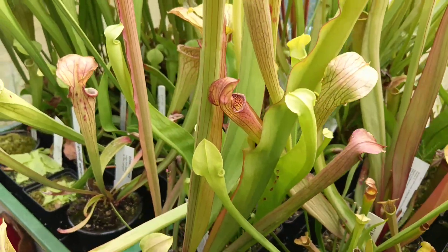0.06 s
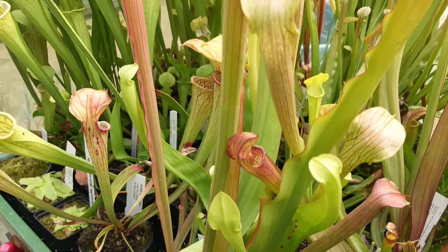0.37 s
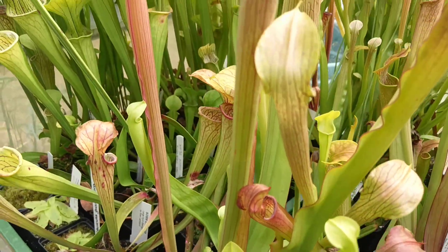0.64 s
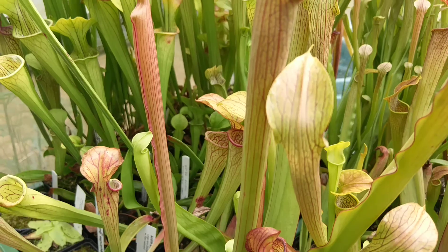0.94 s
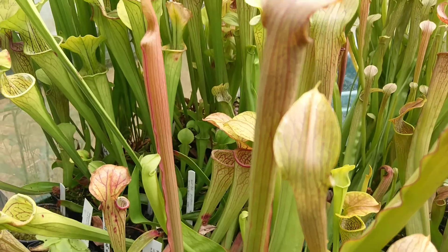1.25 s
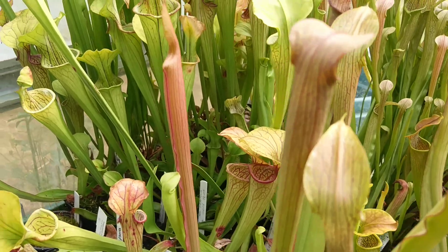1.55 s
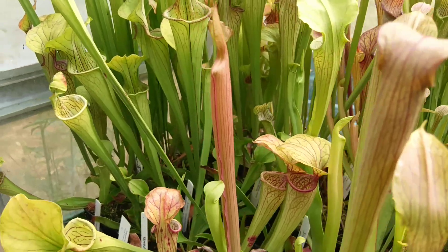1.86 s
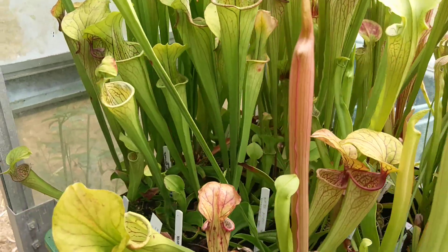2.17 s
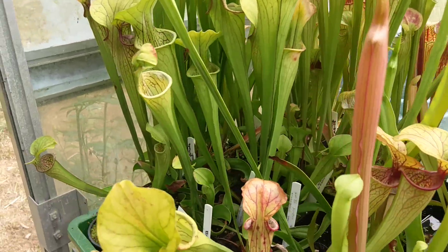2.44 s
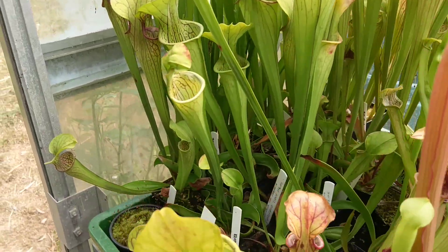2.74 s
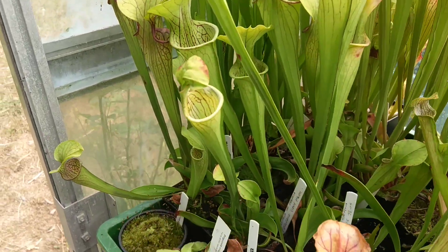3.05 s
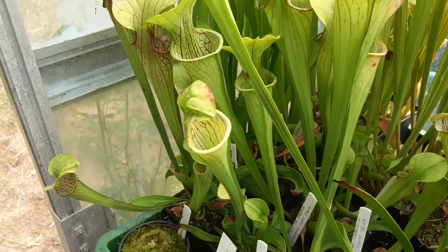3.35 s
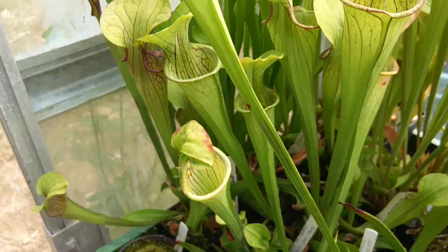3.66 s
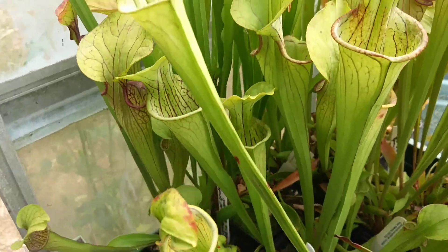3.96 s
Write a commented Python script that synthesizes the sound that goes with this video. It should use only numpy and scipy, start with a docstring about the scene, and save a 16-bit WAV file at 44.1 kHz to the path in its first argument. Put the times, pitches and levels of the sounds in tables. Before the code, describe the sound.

Distant road traffic rushes and rumbles steadily for four seconds, heard inside a greenhouse. A low engine drone comes up at about 0.8 seconds, drops away near 2.4, then returns stronger at 2.7 and rises in pitch as it pulls away. A second, slightly higher engine swells and ebbs, fading by 2.6. Between 2.7 and 3.7 seconds, nearby leaves tick faintly over a thin hiss.

```python
"""A steady rush with a low hum under it, heard inside a greenhouse: most likely a road some way off.
The rush, the traffic's rumble and the tyres' roar are random noise, each with its own spectral envelope.
The hum is periodic, set by engine firing rates: one engine drones, lets go for a moment and pulls away,
rising in pitch; a second, higher one fades out. A room resonance lifts overtones that pass through it.
Near the microphone, leaves tick faintly, as damped bursts of noise, over a thin hiss."""
import sys
import numpy as np
from scipy import signal
from scipy.fft import rfft, irfft
from scipy.io import wavfile
from scipy.ndimage import uniform_filter1d

SR = 44100
rng = np.random.default_rng(int(sys.argv[2]) if len(sys.argv) > 2 else 0)


def generate_wav(sig):
    """Save sig (samples, or channels by samples) to the path in sys.argv[1] as 16-bit PCM at SR."""
    pcm = np.round(np.clip(np.atleast_2d(sig).T, -1, 1) * 32767).astype(np.int16)
    wavfile.write(sys.argv[1], SR, pcm)


N = 176400


def amp(db):
    """The decibel scale: amplitude grows tenfold every 20 dB."""
    return 10 ** (np.asarray(db) / 20)


def unit_rms(x):
    """Normalisation to unit mean power."""
    return x / np.sqrt(np.mean(x ** 2) + 1e-20)


def at_hz(points, hz):
    """Interpolation of a spectrum on a logarithmic frequency axis."""
    f, value = np.transpose(points)
    return np.interp(np.log(hz + 1), np.log(f + 1), value)


def at_time(points, t):
    """Linear interpolation of each column of a table at times t."""
    times, *columns = np.transpose(points)
    return [np.interp(t, times, column) for column in columns]


def seconds():
    """Uniform sampling: the time of each sample."""
    return np.arange(N) / SR


def drift(rate_hz):
    """Slow random modulation: low-passed noise of rms 1."""
    f = np.fft.rfftfreq(N, 1 / SR)
    return unit_rms(irfft(rfft(rng.standard_normal(N)) * np.exp(-(f / rate_hz) ** 2), N))


def bell(f, hz, octaves):
    """A Gaussian weight in log frequency, centred on hz."""
    return np.exp(-.5 * (np.log2((f + 1) / hz) / octaves) ** 2)


def band(x, hz, octaves):
    """Band-pass filtering by a bell-shaped weight on the spectrum."""
    return irfft(rfft(x) * bell(np.fft.rfftfreq(N, 1 / SR), hz, octaves), N)


# Likeness of the two channels: (frequency [Hz], coherence [0 to 1])
COHERENCE = [(40, 1), (80, 0.9), (110, 0.71), (140, 0.56), (190, 0.046), (260, 0.59), (340, 0.54),
             (460, 0.59), (610, 0.79), (820, 0.91), (1100, .58), (1470, 0.57), (1960, 0.85), (2620, 0.82),
             (3500, 0.29)]
# Interchannel level difference: (frequency [Hz], left minus right [dB])
BALANCE = [(80, -1), (170, 2.5), (260, 0), (380, -3.5), (550, -0.5), (790, 1.5), (1140, -0.5), (1650, .5),
           (2400, 0), (3500, -2), (5000, -0.2), (7200, -.4), (11000, .2)]
# Interchannel phase difference: (frequency [Hz], lead of the left [rad])
PHASE_LEAD = [(100, 0.11), (260, -0.36), (600, 0.044), (950, 0.26), (1720, -0.37), (2800, -0.032)]

def noise(colour, patchy_db, coherence=None, size=2048):
    """Partially coherent stereo noise of rms 1, with spectral envelope colour(t, hz) in dB."""
    hop = size // 4
    t = np.arange(N // hop + 3)[:, None] * hop / SR
    hz = np.fft.rfftfreq(size, 1 / SR)
    a, b, c, d, patches = rng.standard_normal((5, len(t), len(hz)))
    # Smoothing over time and frequency leaves drifting patches of level.
    patches = unit_rms(uniform_filter1d(uniform_filter1d(patches, size=12, axis=0), size=8, axis=1))
    if coherence is None:
        coherence = at_hz(COHERENCE, hz)
    left, independent = a + 1j * b, c + 1j * d
    right = coherence * left + np.sqrt(1 - coherence ** 2) * independent
    right *= np.exp(-1j * at_hz(PHASE_LEAD, hz))
    lean = amp(at_hz(BALANCE, hz) / 2)
    spectra = np.array([left * lean, right / lean]) * amp(colour(t, hz) + patchy_db * patches)
    _, sound = signal.istft(spectra.swapaxes(1, 2), nperseg=size, noverlap=size - hop)
    return unit_rms(sound[:, :N])


# Spectrum of the hiss: (frequency [Hz], relative density [dB])
HISS_SPECTRUM = [(1500, -4), (3300, 7), (4300, 6.5), (5200, 3.5), (5700, 0.5), (7000, -1.5), (10000, -1.5),
                 (15500, -3)]

def hiss():
    """Incoherent noise: a thin hiss, almost unrelated in the two channels."""
    return amp(-72) * noise(lambda t, hz: at_hz(HISS_SPECTRUM, hz), patchy_db=1.3, coherence=-.055, size=512)


# Envelope of the rustle: (time [s], level [dB])
RUSTLE_LEVEL = [(0, -79.5), (.35, -84), (.8, -89), (2, -91), (2.5, -81.5), (2.75, -80.5), (3.2, -81),
                (3.45, -86), (3.7, -79.5), (4, -83)]
# Leaf ticks: (onset [s], level [dB], centre frequency [Hz], width [octaves])
LEAF_TICKS = [(2.698, -70, 4620, .16), (2.83, -70, 6100, .12), (2.872, -68, 4980, 0.04),
              (3.04, -73, 6330, 0.072), (3.131, -65, 4870, .2), (3.681, -70.5, 5400, .06)]

def leaves(grains_per_s=700, rise_s=.002, t60_s=.084, right_bias_db=6.5):
    """Impulsive excitation: leaves rustle in sparse random grains and tick with exponential decay."""
    t = seconds()
    grains = rng.standard_normal((2, N)) * (rng.random(N) < grains_per_s / SR)
    out = unit_rms(band(grains, hz=4480, octaves=.43)) * amp(at_time(RUSTLE_LEVEL, t)[0])
    for onset, db, hz, octaves in LEAF_TICKS:
        age = np.maximum(t - onset, 0)
        attack = np.minimum(age / rise_s, 1)
        decay = amp(-60 * np.minimum(age / t60_s, 10))
        out += amp(db) * attack * decay * unit_rms(band(rng.standard_normal((2, N)), hz, octaves))
    return out * amp(np.array([[-right_bias_db], [right_bias_db]]) / 2)


# Spectrum of the rumble: (frequency [Hz], relative density [dB])
RUMBLE_SPECTRUM = [(8, -26), (19, -1), (30, 0), (42, 1), (62, -1.5), (78, -5), (88, -7.5), (108, -4),
                   (125, -10.5), (145, -14.5), (170, -30), (260, -52), (1000, -88)]
# Its envelope: (time [s], level [dB])
RUMBLE_LEVEL = [(0, -49), (.2, -49.5), (.45, -51), (.75, -51), (1.4, -53), (2.1, -51.5), (2.6, -52.5),
                (3.3, -53), (4, -53)]

def rumble():
    """Aperiodic low-frequency sound: the deep, pitchless part of the traffic."""
    deep = noise(lambda t, hz: at_hz(RUMBLE_SPECTRUM, hz), patchy_db=1.5, size=8192)
    return deep * amp(at_time(RUMBLE_LEVEL, seconds())[0])


# Spectrum of the rush: (frequency [Hz], relative density [dB])
RUSH_SPECTRUM = [(90, -28), (175, -11), (225, -3.5), (265, -4), (300, -7), (360, -3.5), (405, -8),
                 (455, -3), (505, -5), (650, -1.5), (900, -5), (1200, -1.5), (1480, 1.5), (1770, -6.5),
                 (2000, -7), (2280, -11), (2720, -11.5), (3050, -21.5), (3500, -33.5), (6000, -42)]
# Its envelopes: (time [s], level [dB], low-band lift [dB], upper-band lift [dB], treble lift [dB])
RUSH_LEVELS = [(0, -52.5, 0.5, 0.5, 0), (.6, -52.5, 0, .5, 1), (.9, -52.5, -2, -0.5, -1.5),
               (1.25, -52, -1, 0.5, -.5), (1.7, -52.5, -3.5, 0, -0.5), (2.1, -53.5, 5.5, -1, -1),
               (2.45, -52, 3.5, 1, -0.5), (2.9, -53, 0, -1.5, 0.5), (3.45, -53, 1, -2, -1),
               (3.78, -50.5, 1.5, -3, -2), (4, -53, 2, 3, 1.5)]

def rush(treble_hz=1810):
    """Broadband noise with a time-varying spectrum: three bands slowly swell and ebb."""
    def colour(t, hz):
        """Cascaded filters add in decibels: the base spectrum, two bells and a treble shelf."""
        _, low_db, upper_db, treble_db = at_time(RUSH_LEVELS, t)
        low = low_db * bell(hz, 246, octaves=.28)
        upper = upper_db * bell(hz, 1280, octaves=.26)
        treble = treble_db * hz ** 2 / (hz ** 2 + treble_hz ** 2)
        return at_hz(RUSH_SPECTRUM, hz) + low + upper + treble

    return noise(colour, patchy_db=1.0) * amp(at_time(RUSH_LEVELS, seconds())[0])


# Spectrum of the tyres' roar: (frequency [Hz], relative density [dB])
TYRE_SPECTRUM = [(520, -27), (620, -14), (710, -11), (790, 2), (840, 2.5), (960, 1), (1030, 1),
                 (1120, -6.5), (1400, -40.5)]
# Its course: (time [s], level [dB], shift of the band [octaves])
TYRE_COURSE = [(0, -56.5, .05), (.35, -54.5, .05), (.72, -56.5, .07), (.97, -53, .07), (1.4, -56.5, 0.031),
               (1.72, -52.5, 0.0027), (2.3, -53.5, -0.023), (2.8, -54, -0.059), (3.3, -54, -0.015),
               (3.65, -52.5, -0.061), (4, -52.5, -.07)]

def tyres():
    """Band-limited noise: the tyres' roar sinks slowly as its whole band shifts down in frequency."""
    roar = noise(lambda t, hz: at_hz(TYRE_SPECTRUM, hz / 2 ** at_time(TYRE_COURSE, t)[1]), patchy_db=1.27)
    return roar * amp(at_time(TYRE_COURSE, seconds())[0])


def room_resonance(hz, centre_hz=118.3, half_width_hz=5.4, peak_db=9.5):
    """Resonance: the lift in dB that the room gives an overtone near its natural frequency."""
    return peak_db / (1 + ((hz - centre_hz) / half_width_hz) ** 2)


def drone(firing_hz, db, orders, waver_share=.0043, waver_db=.64, waver_hz=6.5):
    """Periodic firing gives a tone and weaker partials, all wavering a little in pitch and level."""
    phase = 2 * np.pi * np.cumsum(firing_hz * (1 + waver_share * drift(waver_hz))) / SR
    out = np.sin(phase) * amp(waver_db * drift(waver_hz))
    for order, order_db in orders:
        partial_db = order_db + room_resonance(order * firing_hz) + waver_db * drift(waver_hz)
        out += amp(partial_db) * np.sin(order * phase + 2 * np.pi * rng.random())
    return np.sqrt(2) * amp(db) * out


# The farther engine: (time [s], firing rate [Hz], level [dB])
FAR_COURSE = [(0, 69.9, -66), (.3, 68.5, -51.5), (.75, 68.5, -56), (1.3, 67.1, -52), (1.7, 67.6, -72),
              (2.05, 67.38, -57), (2.3, 67.2, -49.5), (2.6, 66.36, -61), (4, 66.07, -63)]
# Its overtone: (frequency [multiple of the firing rate], relative level [dB])
FAR_ORDERS = [(2, -21)]

def far_engine():
    """Slow amplitude modulation: the higher drone swells and ebbs, then fades out."""
    return drone(*at_time(FAR_COURSE, seconds()), FAR_ORDERS)


# Pitch of the nearer engine: (time [s], firing rate [Hz])
NEAR_FIRING = [(0, 53.24), (1, 51.95), (2.15, 50.67), (2.4, 52.23), (2.68, 52.33), (2.9, 54.6), (3.2, 56.2),
               (3.75, 58.7), (4, 60.95)]
# Its envelope: (time [s], level [dB])
NEAR_LEVEL = [(0, -65), (.4, -59), (.68, -60), (.85, -50), (1.75, -48.5), (2.25, -50), (2.42, -66),
              (2.56, -62), (2.68, -41), (2.8, -42), (3.05, -45.5), (3.45, -44), (3.7, -46.5), (4, -48.5)]
# Its partials: (frequency [multiple of the firing rate], relative level [dB])
NEAR_ORDERS = [(.5, -26), (1.5, -19.5), (2, -21), (3, -41)]

def near_engine():
    """Pitch follows firing rate: the engine drones, lets go for a moment and rises as it pulls away."""
    t = seconds()
    return drone(*at_time(NEAR_FIRING, t), *at_time(NEAR_LEVEL, t), NEAR_ORDERS)


def scene():
    """Superposition: all sources add at the microphone, the engines alike in both channels."""
    return near_engine() + far_engine() + rumble() + rush() + tyres() + hiss() + leaves()


def record(dry, cutoff_hz=15720):
    """Band limiting: the recorder acts as a steep low-pass filter."""
    low_pass = signal.firwin(1023, cutoff_hz, window=("kaiser", 9), fs=SR)
    return signal.oaconvolve(dry, low_pass[None], "same")


dry = scene()
out = record(dry)
generate_wav(out)
```